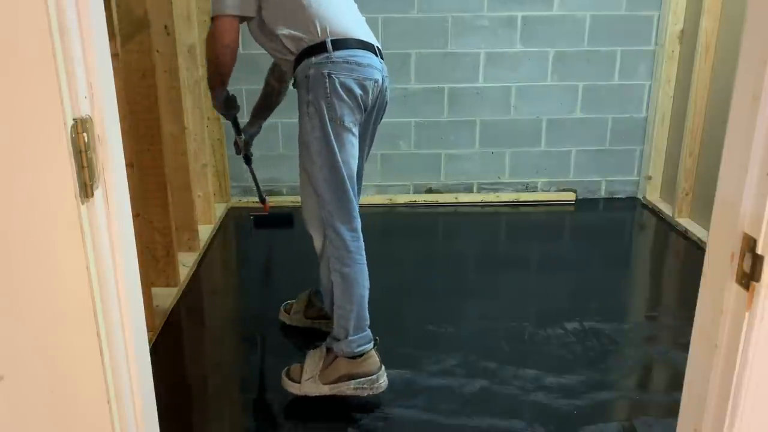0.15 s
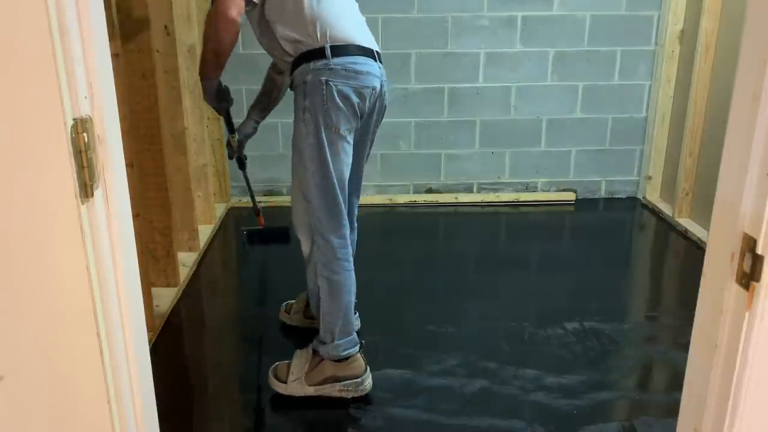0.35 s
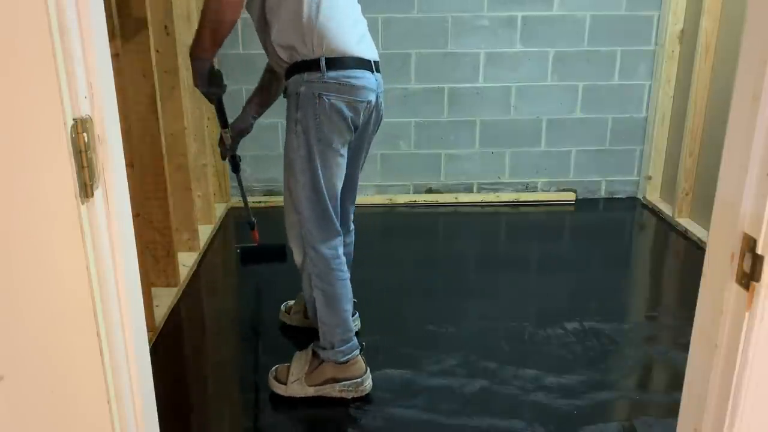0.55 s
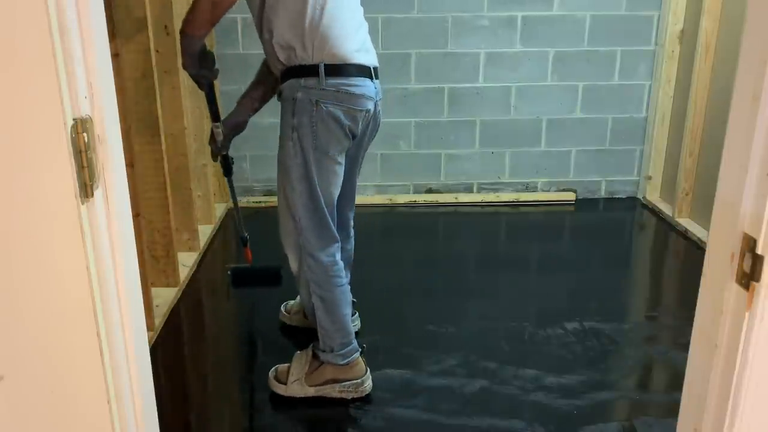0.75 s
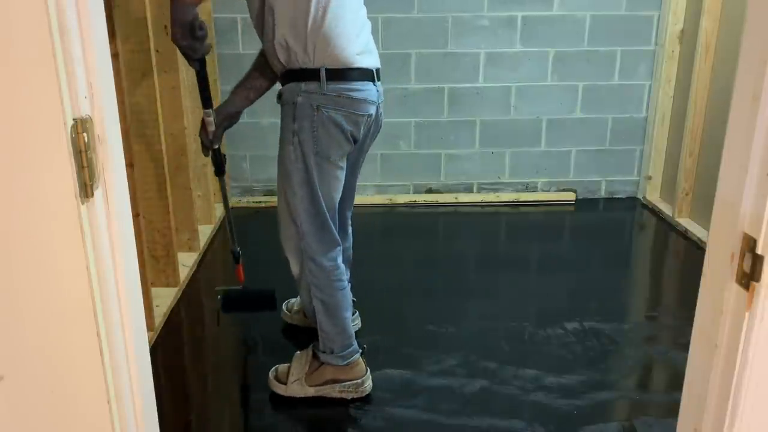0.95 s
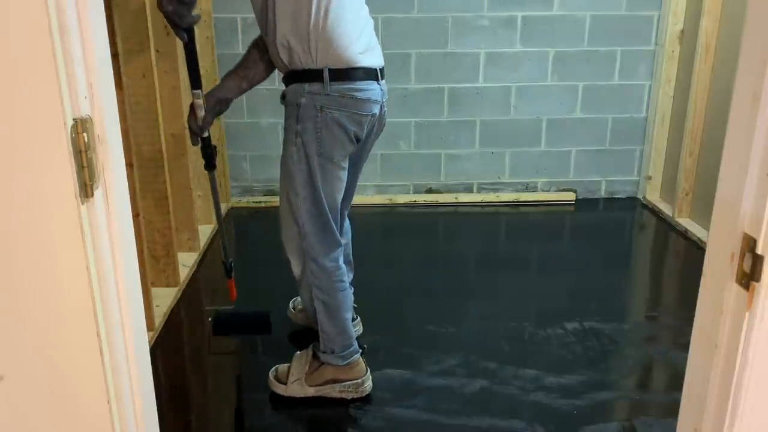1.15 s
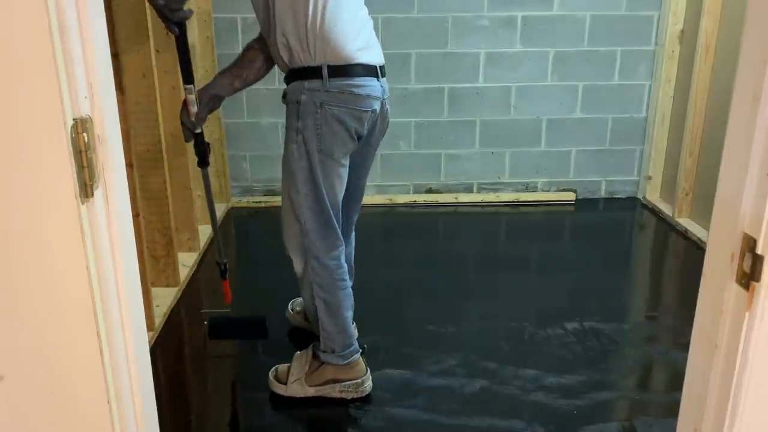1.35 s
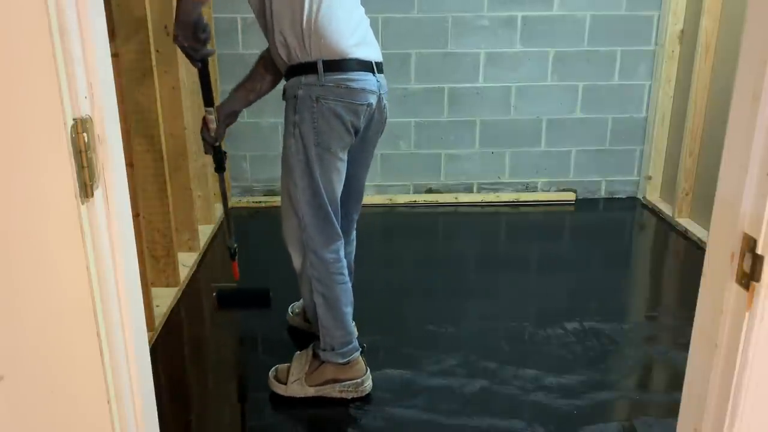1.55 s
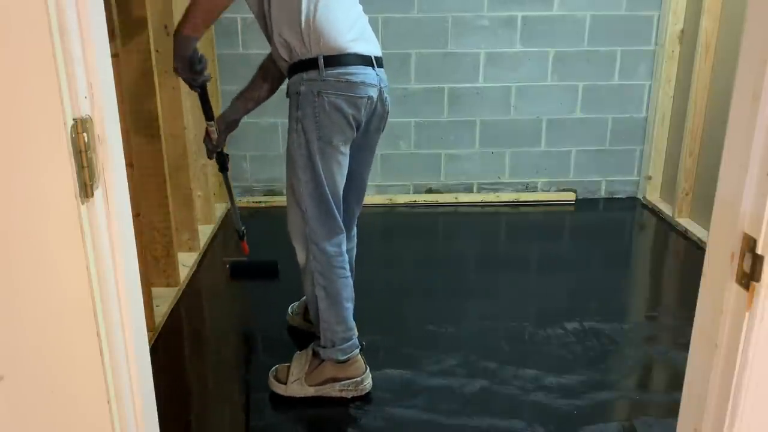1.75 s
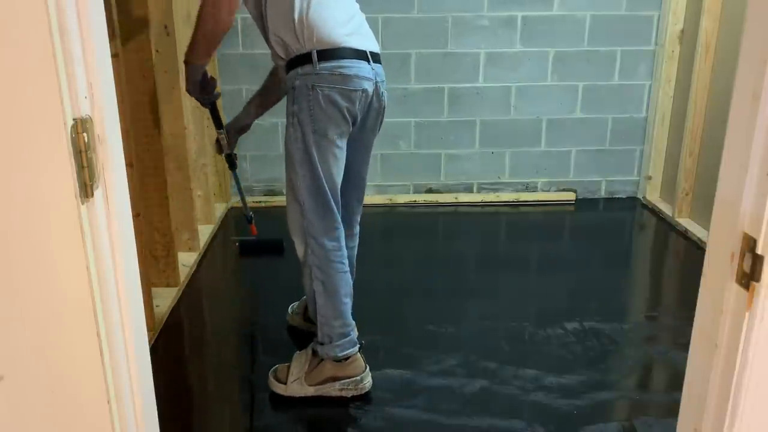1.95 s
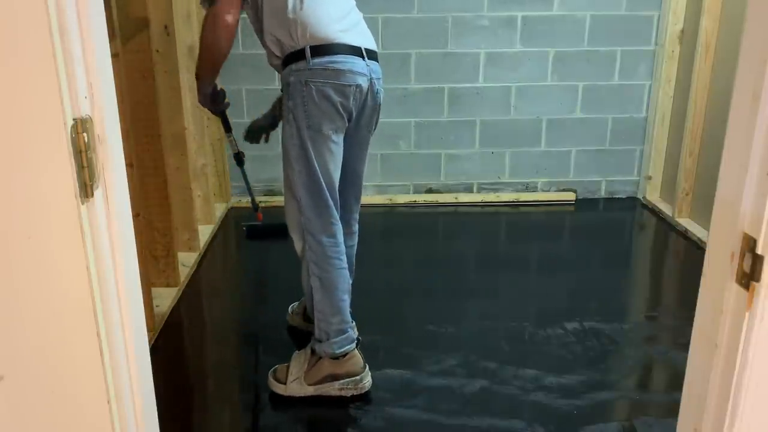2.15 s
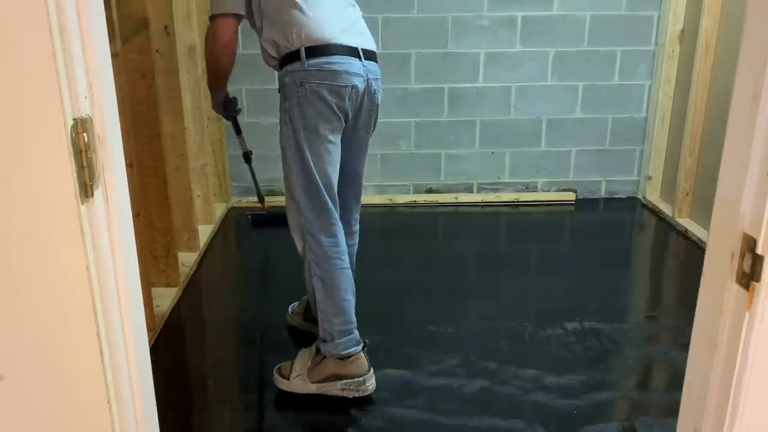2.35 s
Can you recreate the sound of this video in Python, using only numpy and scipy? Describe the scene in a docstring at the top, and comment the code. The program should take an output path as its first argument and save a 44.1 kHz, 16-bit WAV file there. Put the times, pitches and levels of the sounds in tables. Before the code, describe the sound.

A paint roller on a pole makes a bright, sticky, crackling sizzle through wet coating, stops, clacks a few times, then sizzles again with faint squeaky singing and rubbing; small bare room, close, thin microphone sound.

```python
"""A dense bright sizzle comes and goes, with singing, rubbing and hard knocks that ring in a small bare room.
It is a roller on a pole, pulled and pushed through wet coating on concrete.
Tearing sticky film is made of many short noise puffs; the hollow core and the cage are noise in resonances.
Knocks are sums of dying tones with an echo; soft noise adds a low murmur, moans, scuffs and room tone.
The microphone cuts the bass."""
import sys
import numpy as np
from scipy import signal
from scipy.fft import rfft, irfft
from scipy.io import wavfile
from scipy.ndimage import uniform_filter1d

SR = 44100
rng = np.random.default_rng(int(sys.argv[2]) if len(sys.argv) > 2 else 0)


def dump(signal):
    """Clip the signal to [-1, 1] and save it as 16-bit WAV at the path in sys.argv[1]."""
    limited = np.clip(np.atleast_2d(signal).T, -1, 1)
    pcm = np.round(limited * 32767).astype(np.int16)
    wavfile.write(sys.argv[1], SR, pcm)


def nominal_scale(level):
    """Amplitude ratio for a level in decibels (scalar or array-like)."""
    x = np.asarray(level, float) / 20
    return 10 ** x


N = 105840  # length in samples (2.4 s)

# Sticky film tearing. Each row: time in seconds, level in dB, fullness of the lower layer in dB
# (LOWER_LAYER_DB is added to it).
FILM_LEVEL = [(0.0, -86.5, -5), (0.06, -85.5, -5), (0.11, -60.5, -18), (0.13, -57.5, -23),
              (0.27, -49.5, -13), (0.41, -47.5, -11.5), (0.47, -49, -11), (0.85, -50.5, -13),
              (0.91, -48.5, -11), (0.95, -64, -7), (1.0, -64.5, -9.5), (1.3, -69.5, -8), (1.38, -85, -6.5),
              (1.39, -74, -13), (1.43, -70.5, -19.5), (1.47, -79.5, -4), (1.52, -67, -14),
              (1.54, -50.5, -19), (1.56, -53.5, -9), (1.7, -45.5, -15), (1.72, -48.5, -10.5),
              (1.89, -51.5, -10), (1.98, -48, -17), (2.02, -52, -13), (2.09, -50.5, -37),
              (2.16, -58.5, -15), (2.2, -69, -10), (2.22, -67, -12.5), (2.28, -70.5, -10.5),
              (2.4, -70.5, -7.5)]
# Colour of the bright layer. Each row: frequency in Hz, level in dB.
FILM_BRIGHT_COLOUR = [(3000, -31), (5000, -10), (6500, -3.5), (8500, -0.5), (11000, 1.5), (13500, 2),
                      (14300, -7.5), (15000, -10.5)]
# Colour of the lower layer. Each row: frequency in Hz, level in dB.
FILM_LOWER_COLOUR = [(1500, -47), (2300, -21.5), (2800, -1), (4000, -2.5), (5500, -0.5), (7000, -0.5),
                     (10000, -32)]
LOWER_LAYER_DB = 2.5
THREADS_PER_S, THREAD_SPREAD_DB = 2500, 3
THREAD_SHARE = 0.51  # part of the noise power that lies in the puffs, 0 to 1
PATCH_DB = 2.5  # how strongly patches of the sizzle swell and fade

# Core singing on the push. Each row: time in seconds, level in dB, level of the upper resonances in dB.
CORE_LEVEL = [(1.55, -80, -8), (1.616, -87, -6), (1.7, -61, -3), (1.74, -72, 11.5), (1.776, -65, -9),
              (1.938, -63, -5), (1.978, -68, -2), (2.008, -60, 0), (2.04, -67.5, 1), (2.062, -69.5, 0),
              (2.126, -85, 14.5), (2.162, -68, -1), (2.22, -64.5, -2.5), (2.248, -69.5, -3), (2.28, -95, 6),
              (2.324, -85, -3), (2.346, -94, -7), (2.4, -80, 1)]
# Resonances of the hollow core, lowest first. Each row: frequency in Hz, width in Hz, level in dB.
CORE_RESONANCES = [(3013, 69, 2), (4994, 130, 0.5), (7050, 83, 1), (9060, 250, -7.5), (12700, 1000, 6)]

# Rubs of the cage. Each row: centre in seconds, length in seconds, level in dB, pitch in Hz,
# level of the side resonances in dB.
CAGE_RUBS = [(1.697, 0.031, -59.5, 919, 3.5), (1.735, 0.038, -67, 847, 0), (1.864, 0.032, -54.5, 962, -2.5),
             (1.92, 0.029, -66.5, 950, 5), (2.028, 0.042, -61, 885, 0.5), (2.202, 0.052, -57.5, 874, -1.5),
             (2.39, 0.024, -60, 876, -13)]
# Resonances of the cage, main one first. Each row: multiple of the pitch, width in Hz, level in dB.
CAGE_RESONANCES = [(1, 55, 0), (.78, 60, -5), (1.62, 90, -14), (2.0, 120, -9)]

# Single knocks. Each row: start in seconds, peak in dB before the treble is cut, brightness in dB per octave.
KNOCK_TIMES = [(0.485, -22.5, 6), (0.4883, -28, 18), (0.4906, -46, 27), (.5, -33.5, -15), (.515, -21, -5.5),
               (0.5253, -35, 2), (0.53, -36, -1), (0.54, -28.5, 1.5), (0.5456, -48, 28), (0.553, -33.5, 4),
               (.56, -66, 2), (.587, -66, 19), (0.597, -39.5, -8.5), (1.4369, -26.5, 17.5),
               (1.4395, -29.5, 10.5), (1.4428, -22.5, -3.5), (1.448, -34, 12.5), (1.456, -35, 2),
               (1.467, -33, 4), (1.474, -33, -2.5), (1.487, -40, 5), (1.493, -34, 1), (1.503, -36.5, 0.5)]
# Ringing tones in every knock. Each row: frequency in Hz before detuning, level in dB before brightness,
# time to fall by 60 dB in seconds.
KNOCK_TONES = [(250, -14, 0.1), (458, -21, 0.09), (950, 2, 0.024), (1226, 15.5, 0.0093), (1600, -1.5, .015),
               (2116, -2, 0.0097), (2276, -2, 0.013), (2758, -7.5, 0.017)]
KNOCK_RISE_S, KNOCK_TOP_HZ = 0.00076, 3150
# How the room dies away. Each row: frequency in Hz, time to fall by 60 dB in seconds.
ROOM_DECAY = [(200, 0.14), (500, 0.24), (1000, 0.26), (2000, 0.29), (4000, 0.34)]
ROOM_DB = -3

# Narrow noise that swells and fades. Each row: centre in seconds, length in seconds, level in dB,
# pitch in Hz, width in Hz.
FAINT_MOANS = [(0.33, 0.13, -79.5, 1930, 120), (0.26, 0.24, -86.5, 900, 150), (0.73, 0.14, -66, 393, 66),
               (0.73, 0.093, -66, 674, 60), (0.9, 0.2, -74, 416, 42), (0.851, 0.03, -62, 860, 40),
               (.828, 0.033, -62.5, 3500, 150), (0.726, 0.045, -64.5, 3050, 220),
               (0.69, 0.063, -68, 505, 98), (0.943, 0.056, -73.5, 486, 40), (0.77, 0.076, -73.5, 700, 33),
               (0.7, 0.044, -71, 1110, 55), (0.9, 0.054, -74.5, 1420, 45), (0.969, 0.059, -64.5, 2800, 404),
               (1.02, 0.082, -66, 1444, 280), (1.0, 0.046, -68, 1370, 98), (0.96, .07, -81.5, 1470, 60),
               (1.173, 0.058, -68.5, 407, 35), (1.87, 0.038, -67.5, 260, 56), (2.132, .08, -70, 3400, 200),
               (2.217, 0.056, -81, 226, 37), (2.218, 0.029, -76, 3800, 86), (2.304, 0.045, -81, 1800, 78)]
# Broad scuffs. Each row: centre in seconds, length in seconds, level in dB, pitch in Hz, width in Hz.
BROAD_SCUFFS = [(0.092, 0.012, -62.5, 8400, 3000), (0.139, 0.022, -68.5, 3800, 1200),
                (0.42, 0.041, -80, 1190, 506), (0.627, 0.059, -72, 1350, 400),
                (0.983, 0.03, -78, 2100, 495), (1.418, 0.026, -53, 600, 463), (1.436, 0.012, -53, 870, 760),
                (1.453, 0.046, -71, 4040, 600), (1.701, 0.038, -75, 415, 153), (1.89, 0.031, -66, 462, 250),
                (1.876, 0.095, -67, 1600, 387), (2.03, 0.16, -75.5, 1600, 500)]

# Low murmur. Each row: time in seconds, level in dB.
MURMUR_LEVEL = [(0.0, -86), (0.26, -93.5), (0.53, -70), (0.65, -63), (0.69, -61.5), (0.88, -64.5),
                (1.05, -71.5), (1.18, -76), (1.46, -92.5), (1.58, -67.5), (1.64, -63.5), (1.88, -64),
                (2.04, -70), (2.16, -84), (2.33, -82), (2.4, -84)]
# Colour of the murmur. Each row: frequency in Hz, level in dB.
MURMUR_COLOUR = [(88, -84), (150, -59.5), (246, -16.5), (403, -4.5), (561, -15.5), (646, -12), (887, -11),
                 (963, -9), (1080, -7.5), (2500, -11.5), (3250, -37.5), (5500, -120)]
WAVER_DB, WAVER_FRAMES = 6.5, 14  # strength; smoothing in frames of 256 samples

# Colour of the room tone. Each row: frequency in Hz, level in dB.
ROOM_TONE_COLOUR = [(100, -60), (200, 7.5), (400, 8.5), (900, 1.5), (2000, -10.5), (4000, -17.5)]
ROOM_TONE_DB = -86.5

BASS_CUT_HZ, TOP_HZ = 226.7, 14500


def evened(x):
    """Scales a signal to an average (rms) size of one."""
    return x / np.sqrt(np.mean(x ** 2) + 1e-20)


def read(points, hz):
    """Reads a table between its points, on a logarithmic frequency scale."""
    f, value = np.transpose(points)
    return np.interp(np.log(hz + 1), np.log(f + 1), value)


def curve(table, column=1):
    """Spreads a table column over every sample."""
    rows = np.array(table)
    return np.interp(np.arange(N) / SR, rows[:, 0], rows[:, column])


def coloured(x, points):
    """Filters a signal by a spectrum in dB, then evens its level."""
    gain = nominal_scale(read(points, np.fft.rfftfreq(N, 1 / SR)))
    return evened(irfft(rfft(x) * gain, N))


def resonate(x, hz, width_hz):
    """Rings a signal at one pitch; the resonance is passed twice for steep sides."""
    r = np.exp(-1.5 * np.pi * abs(width_hz) / SR)  # each pass is wider than the final width
    poles = [1, -2 * r * np.cos(2 * np.pi * hz / SR), r * r]
    once = signal.lfilter([1, 0, -1], poles, x)
    return evened(signal.lfilter([1, 0, -1], poles, once))


def sizzle():
    """The tearing film: a bright layer and a lower layer of changing fullness."""
    bright = patchy(coloured(threads(), FILM_BRIGHT_COLOUR))
    lower = patchy(coloured(threads(), FILM_LOWER_COLOUR))
    fullness = nominal_scale(curve(FILM_LEVEL, column=2) + LOWER_LAYER_DB)
    return nominal_scale(curve(FILM_LEVEL)) * (bright + fullness * lower)


def threads():
    """Snapping threads: short noise puffs of uneven size over an even hiss."""
    size = nominal_scale(THREAD_SPREAD_DB * np.minimum(rng.exponential(1, N), 4))
    snaps = size * (rng.random(N) < THREADS_PER_S / SR)
    puff = signal.lfilter([1], [1, -0.96], snaps ** 2)  # power that dies after each snap
    power = 1 - THREAD_SHARE + THREAD_SHARE * puff / puff.mean()
    return rng.standard_normal(N) * np.sqrt(power)


def patchy(x):
    """Makes random patches a few hundred hertz wide swell and fade."""
    z = signal.stft(x, nperseg=512)[2]
    patches = rng.standard_normal(z.shape[::-1]).T
    patches = uniform_filter1d(patches, size=3, axis=0)  # across frequency
    patches = evened(uniform_filter1d(patches, size=10, axis=1))  # across time
    return evened(signal.istft(z * nominal_scale(PATCH_DB * patches), nperseg=512)[1][:N])


def core():
    """Friction noise in the odd resonances of the hollow core; the upper ones come and go."""
    drive = threads()
    fade_in = np.clip((np.arange(N) / SR - CORE_LEVEL[0][0]) / 0.027, 0, 1)
    first, *upper = [nominal_scale(db) * resonate(drive, hz, width) for hz, width, db in CORE_RESONANCES]
    upper_gain = nominal_scale(curve(CORE_LEVEL, column=2))
    return fade_in * nominal_scale(curve(CORE_LEVEL)) * (first + upper_gain * sum(upper))


def rubs():
    """Each rub is a soft swell of noise in the cage resonances."""
    t, out, drive = np.arange(N) / SR, np.zeros(N), rng.standard_normal(N)
    for centre, length, db, pitch, sides_db in CAGE_RUBS:
        main, *sides = [nominal_scale(d) * resonate(drive, k * pitch, width) for k, width, d in CAGE_RESONANCES]
        swell = np.exp(-2 * ((t - centre) / length) ** 2)
        out += nominal_scale(db) * swell * (main + nominal_scale(sides_db) * sum(sides))
    return out


def knocks():
    """Each blow rings the same dying tones, slightly detuned; bright blows favour the high ones."""
    t, out = np.arange(4000) / SR, np.zeros(N + 4000)
    rise = np.sin(np.pi / 2 * np.minimum(t / KNOCK_RISE_S, 1)) ** 2
    detunes = rng.uniform(0.87, 1.05, (len(KNOCK_TIMES), len(KNOCK_TONES)))
    for (start, peak_db, bright_db), detune in zip(KNOCK_TIMES, detunes):
        ring = np.zeros(len(t))
        for (hz, db, t60), factor in zip(KNOCK_TONES, detune):
            tilt_db = bright_db * np.log2(max(hz, 700) / 1000)
            ring += nominal_scale(db + tilt_db - 60 * t / t60) * np.sin(2 * np.pi * hz * factor * t)
        ring *= rise
        at = round(start * SR)
        out[at:at + len(t)] += nominal_scale(peak_db) * ring / abs(ring).max()
    treble_cut = signal.butter(10, KNOCK_TOP_HZ, fs=SR, output="sos")
    return signal.sosfilt(treble_cut, out[:N])


def room(x):
    """Echoes as sparse taps of random sign, each band dying at its own speed."""
    taps, at = np.zeros(SR // 2), np.arange(200, SR // 2 - 20, 20)
    taps[at + rng.integers(0, 20, len(at))] = rng.choice([-1., 1.], len(at))
    hz, t, z = signal.stft(taps, SR, nperseg=256)
    decay = nominal_scale(-60 * t / read(ROOM_DECAY, hz)[:, None])
    tail = signal.istft(z * decay, SR, nperseg=256)[1]
    return signal.fftconvolve(x, tail / np.linalg.norm(tail))[:N]


def moans_and_scuffs():
    """Faint moans, squeaks and scuffs: narrow and broad bands of noise under soft swells."""
    t, out, drive = np.arange(N) / SR, np.zeros(N), rng.standard_normal(N)
    for centre, length, db, hz, width in FAINT_MOANS + BROAD_SCUFFS:
        swell = np.exp(-(2 * (t - centre) / length) ** 4 / 4)
        out += nominal_scale(db) * swell * resonate(drive, hz, width)
    return out


def low_murmur():
    """Low murmur: soft low noise whose narrow bands swell and fade at random."""
    hz = np.fft.rfftfreq(1024, 1 / SR)
    a, b, patches = rng.standard_normal((N // 256 + 5, 513, 3)).T
    patches = uniform_filter1d(patches, size=2, axis=0)  # across frequency
    patches = evened(uniform_filter1d(patches, WAVER_FRAMES, axis=1))  # across time
    z = (a + 1j * b) * nominal_scale(read(MURMUR_COLOUR, hz)[:, None] + WAVER_DB * patches)
    murmur = evened(signal.istft(z, nperseg=1024, noverlap=768)[1][:N])
    return nominal_scale(curve(MURMUR_LEVEL)) * murmur


def room_tone():
    """Steady, mostly low noise behind everything."""
    return nominal_scale(ROOM_TONE_DB) * coloured(rng.standard_normal(N), ROOM_TONE_COLOUR)


def scene():
    """Adds all the sounds in one channel; only the knocks get the room's echo."""
    blows = knocks()
    roller = sizzle() + core() + rubs()
    background = moans_and_scuffs() + low_murmur() + room_tone()
    return (roller + blows + nominal_scale(ROOM_DB) * room(blows) + background)[None]


def roll_off(x):
    """The treble ends steeply here."""
    return signal.sosfilt(signal.butter(12, 15590, fs=SR, output="sos"), x)


def record(dry):
    """The microphone cuts the bass steeply; a second filter removes the highest treble."""
    bass_cut = signal.butter(6, BASS_CUT_HZ, "high", fs=SR, output="sos")
    thin = signal.sosfilt(bass_cut, dry)
    treble_cut = signal.firwin(511, TOP_HZ, window=("kaiser", 9), fs=SR)
    mix = signal.oaconvolve(thin, treble_cut[None], "same")
    return roll_off(mix)


dry = scene()
out = record(dry)
dump(out)
```